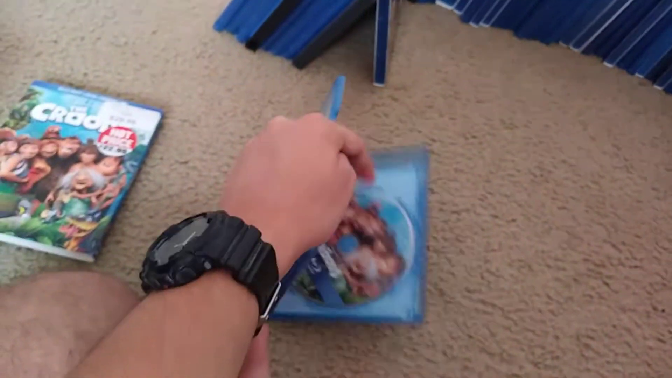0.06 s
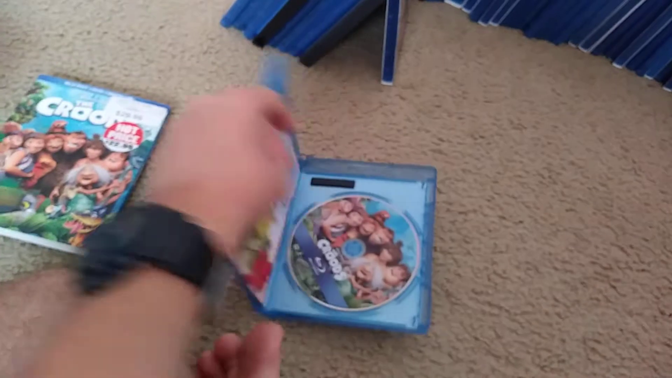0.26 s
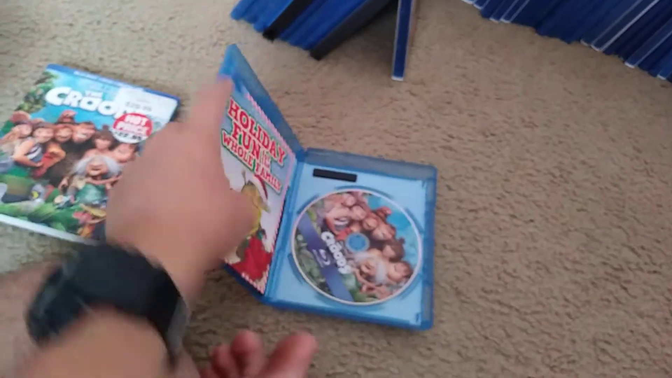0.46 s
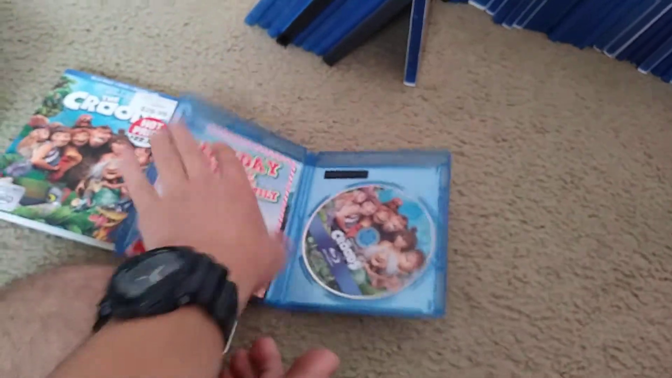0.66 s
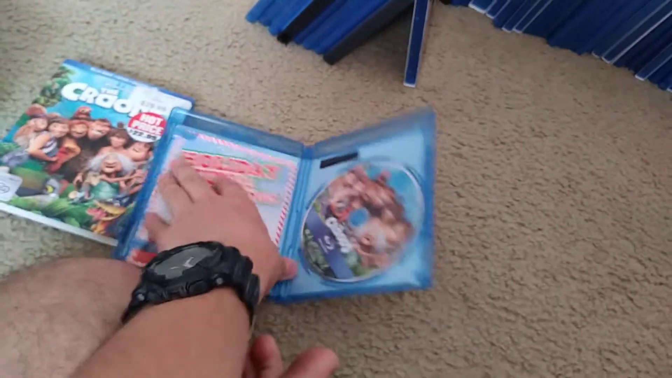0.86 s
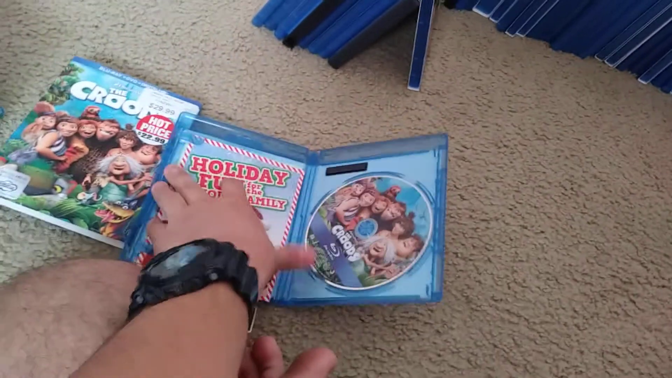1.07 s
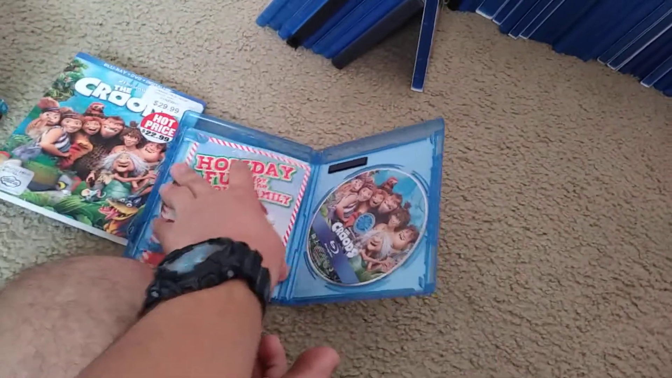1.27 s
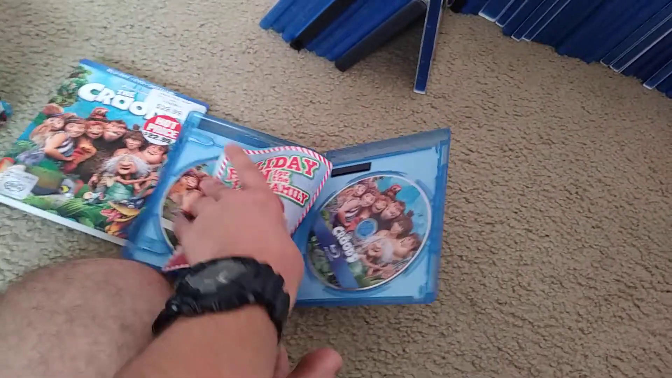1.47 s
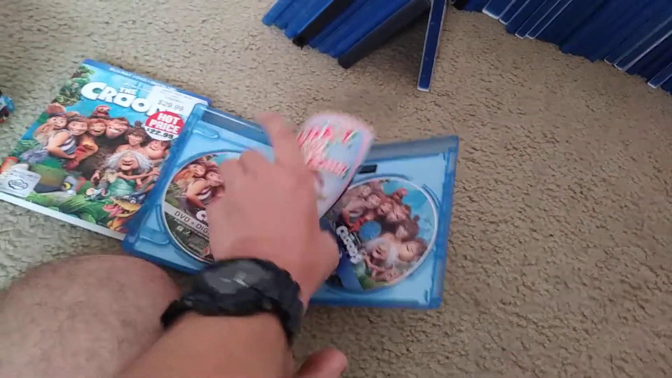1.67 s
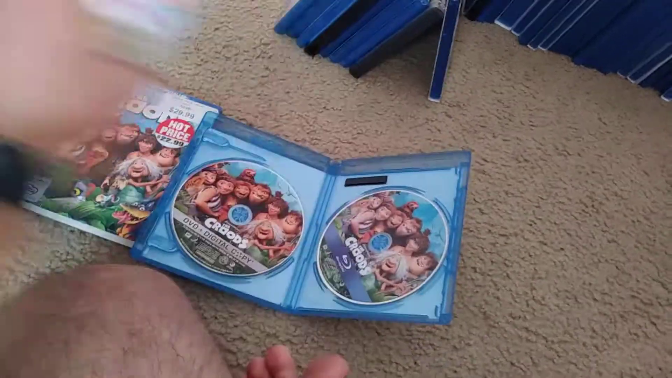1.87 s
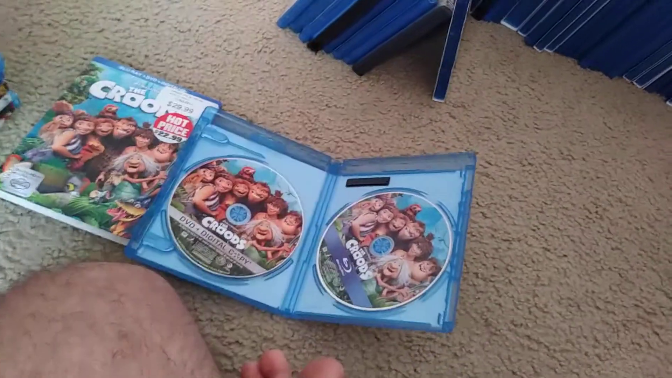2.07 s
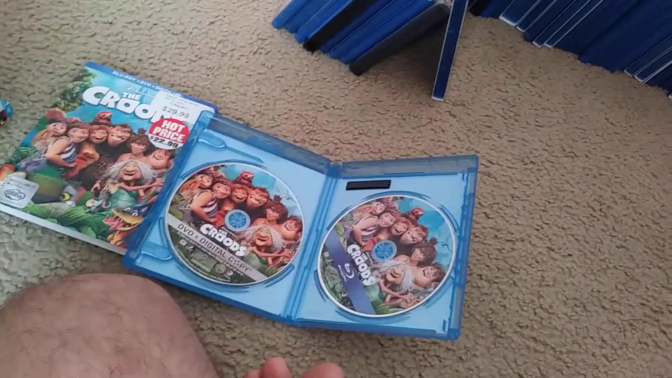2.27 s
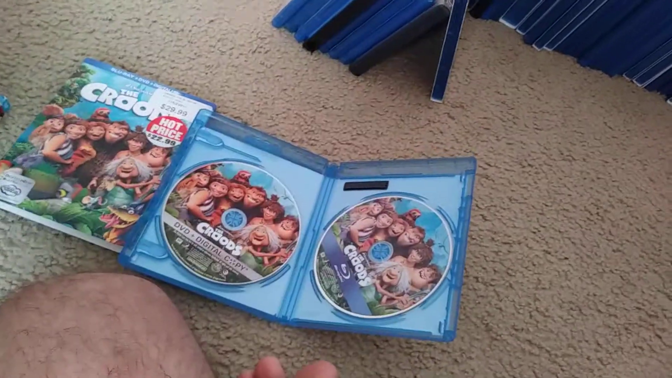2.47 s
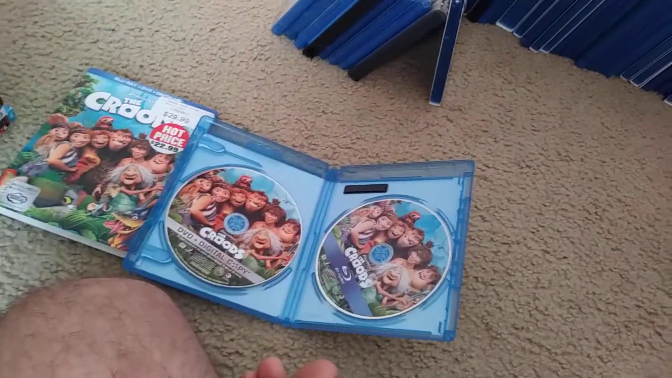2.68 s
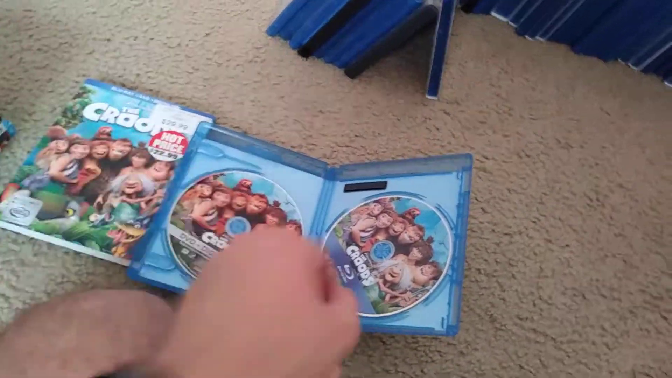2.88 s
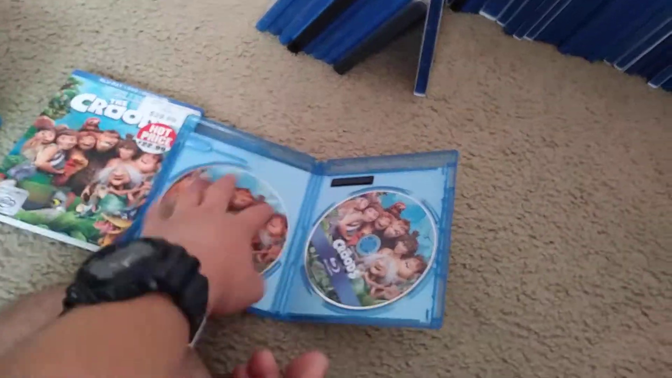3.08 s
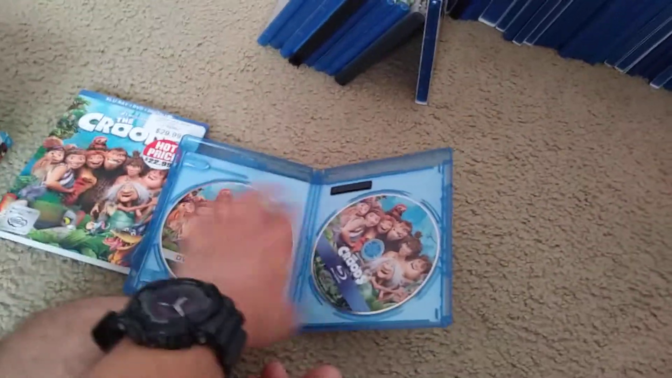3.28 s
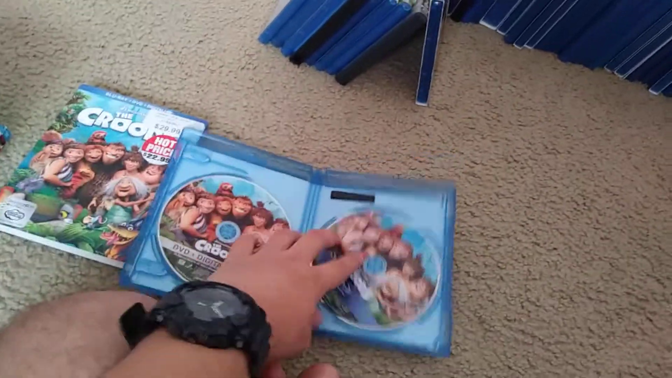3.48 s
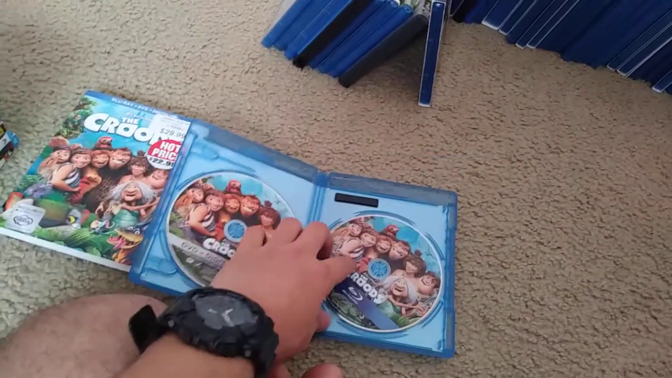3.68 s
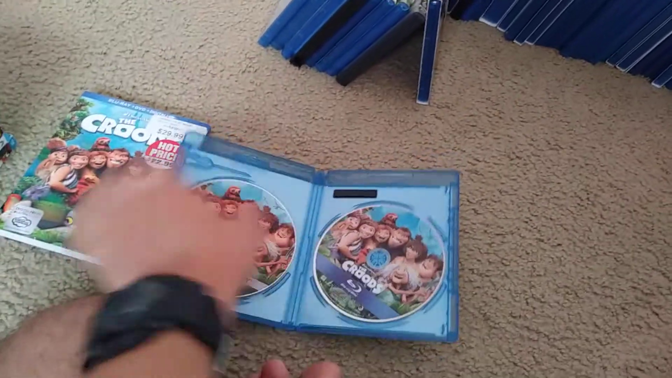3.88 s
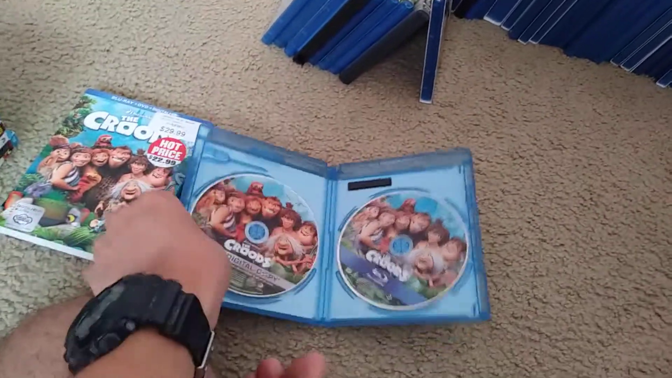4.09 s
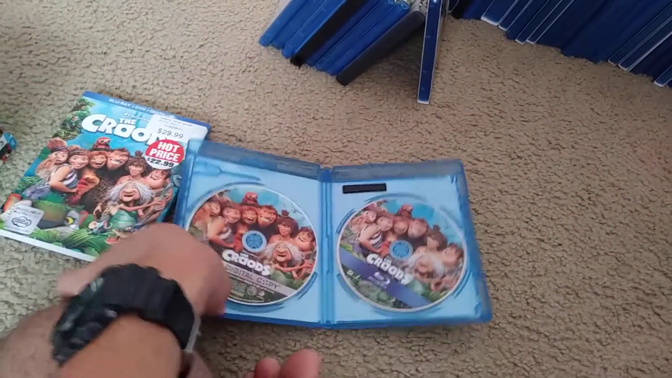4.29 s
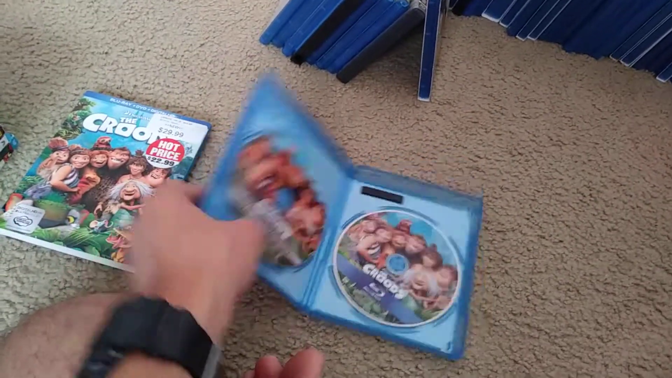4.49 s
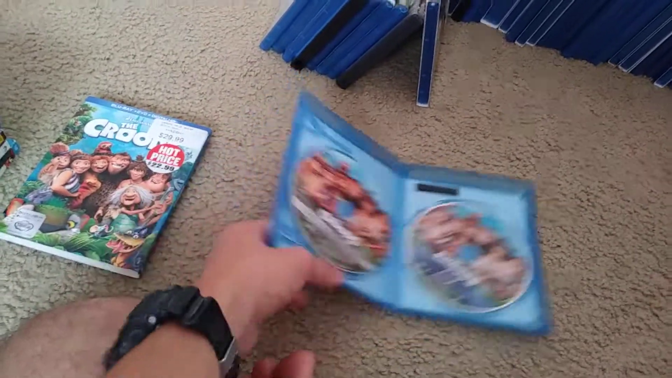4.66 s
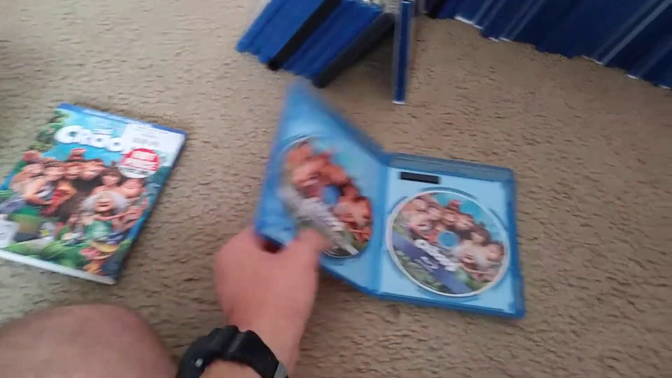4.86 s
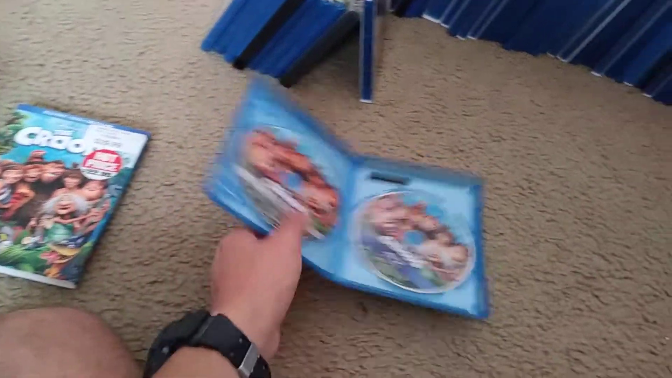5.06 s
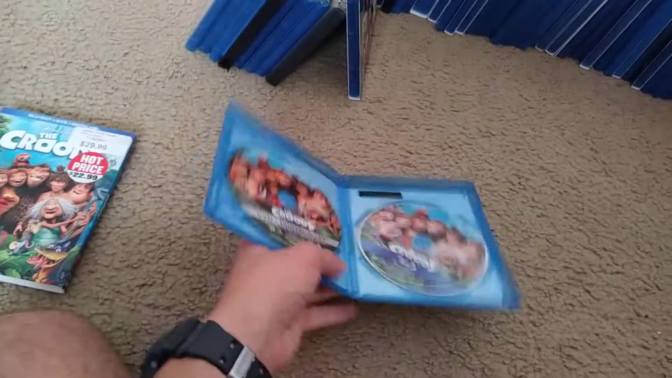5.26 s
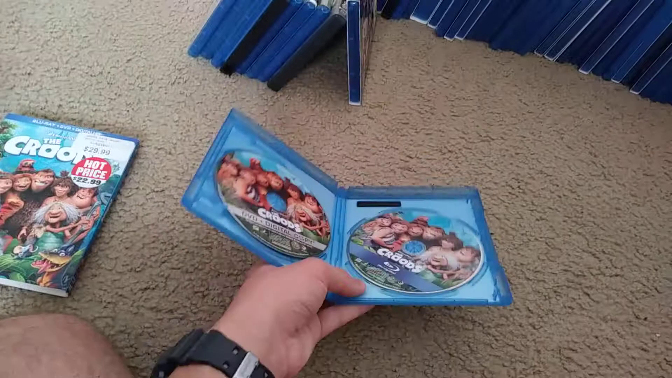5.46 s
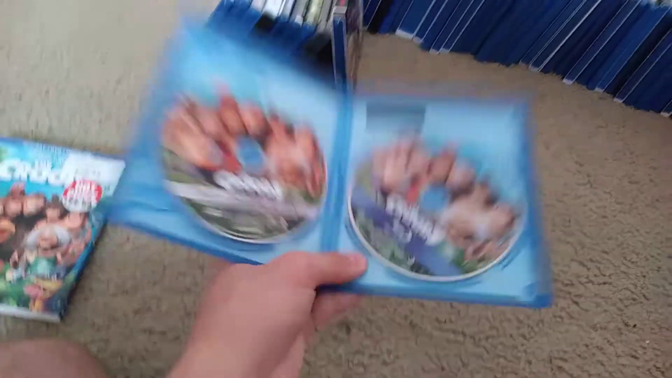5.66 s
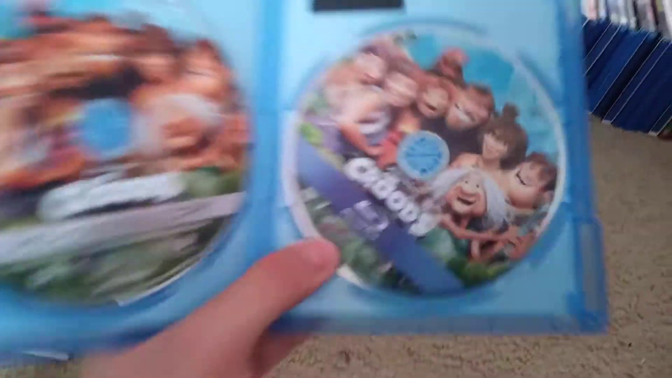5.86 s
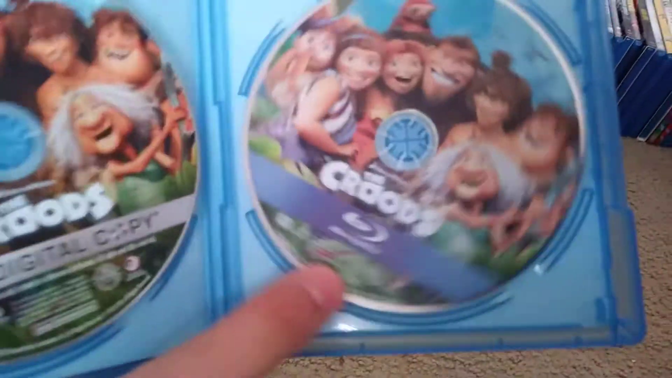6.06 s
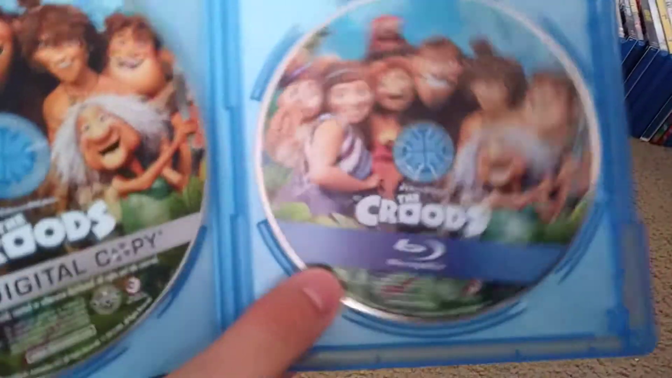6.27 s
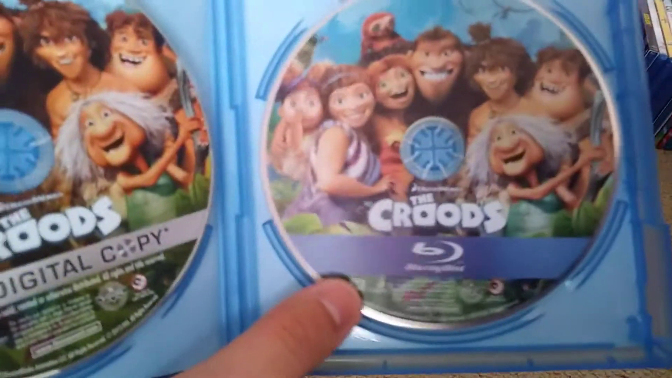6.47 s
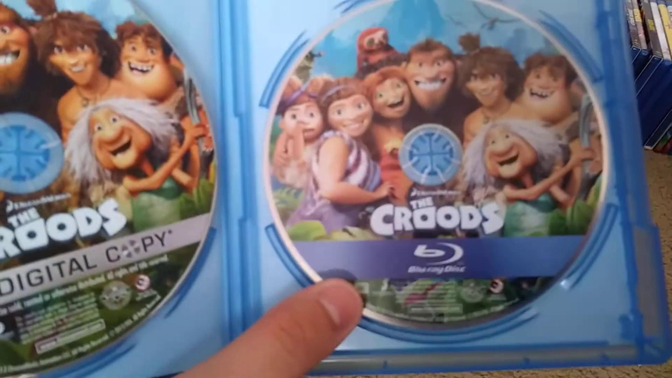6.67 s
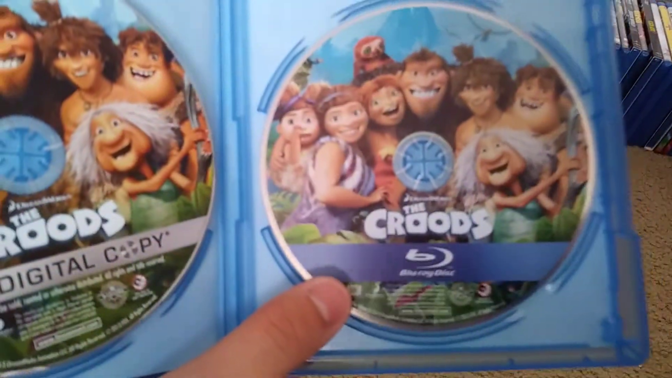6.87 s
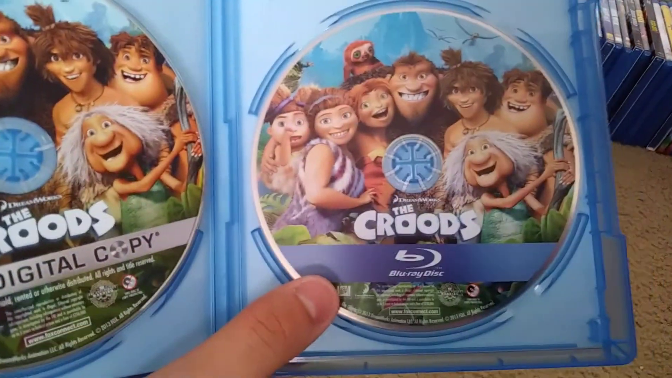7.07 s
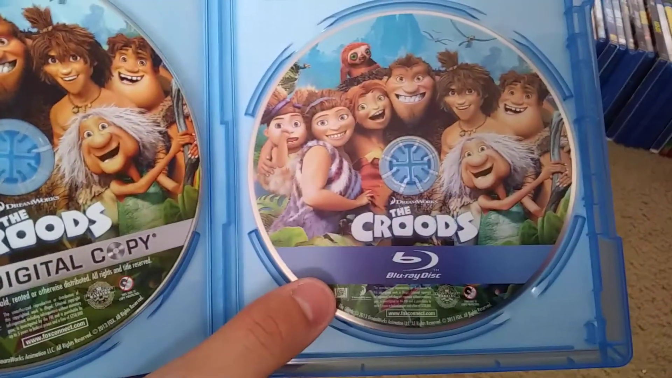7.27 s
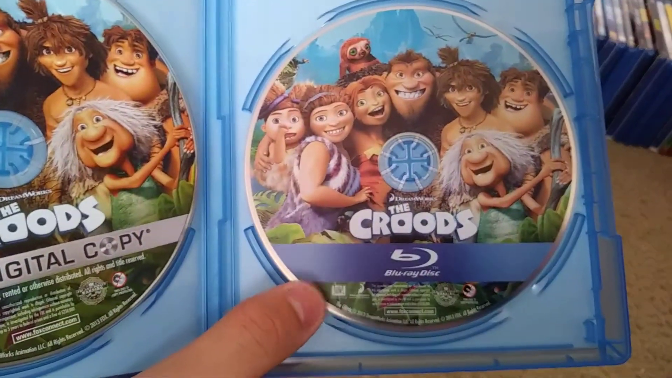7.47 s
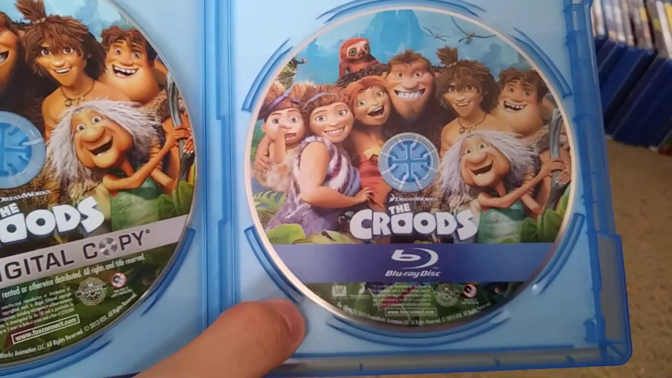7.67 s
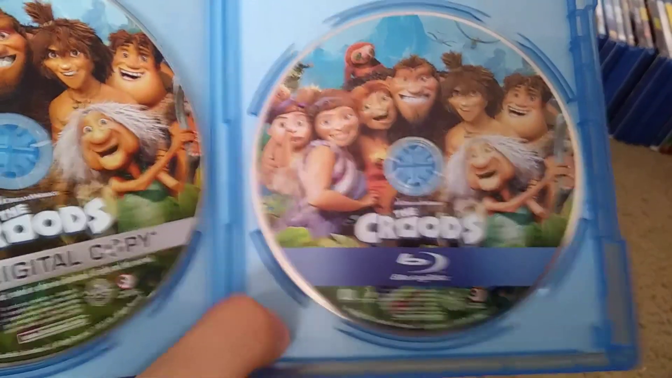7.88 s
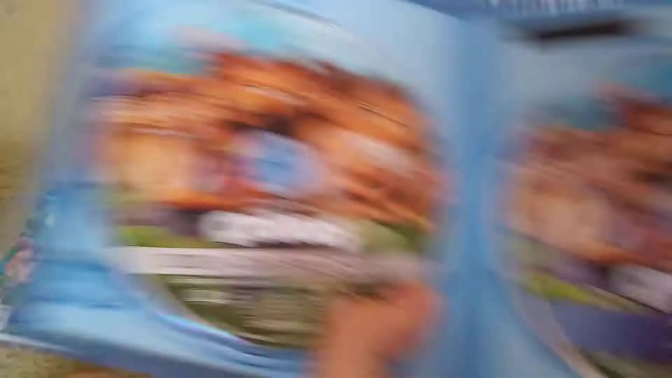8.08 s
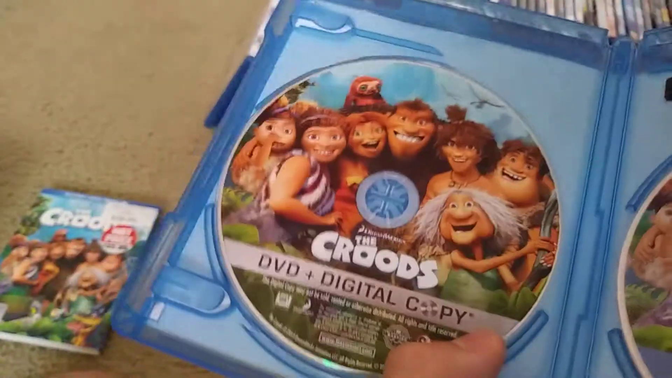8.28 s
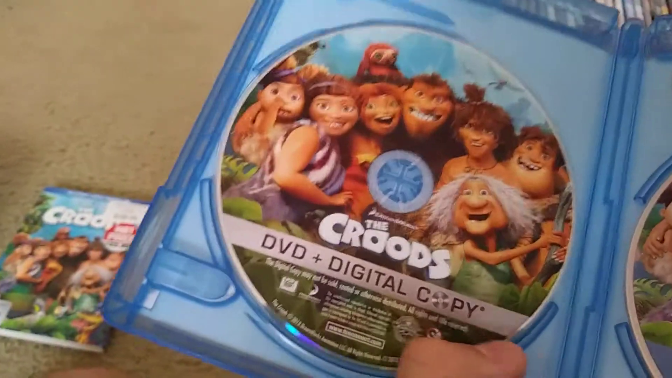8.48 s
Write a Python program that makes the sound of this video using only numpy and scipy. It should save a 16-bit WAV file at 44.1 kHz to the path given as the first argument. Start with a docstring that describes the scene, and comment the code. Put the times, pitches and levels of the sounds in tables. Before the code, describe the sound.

Loud, bright snaps of thin plastic come first, followed by finger slips, a high stick-slip squeak and a solid clack. Paper slides briefly out from under plastic tabs. After sparse light taps, the case is picked up with creaks, dull knocks and ticks, then faint finger rubbing. It is close and dry, with short small-room reflections, soft hiss and a barely audible camera motor.

```python
"""A plastic disc case is snapped open on the carpet of a small room, close to a hand-held camera: filtered bursts.
The lid squeaks back in stick-slip, a paper leaflet slides out, and the case is lifted and tilted, creaking and
ticking: random friction jerks and soft resonant bumps. A pattern of reflections makes the room.
The camera adds hiss, a low hum and a lens drive's faint note; its noise suppressor holds down the hiss
between the sounds, and a limiter rounds off the loudest snaps."""
import sys
import numpy as np
from scipy import signal
from scipy.fft import rfft, irfft
from scipy.io import wavfile
from scipy.ndimage import uniform_filter1d, minimum_filter1d

SR = 44100
rng = np.random.default_rng(int(sys.argv[2]) if len(sys.argv) > 2 else 0)


def pcm_store(signal):
    """Save signal as 16-bit PCM."""
    levels = np.round(np.clip(np.atleast_2d(signal), -1, 1) * 32767)
    wavfile.write(sys.argv[1], SR, levels.astype(np.int16).T)


N = 376613
TIME = np.arange(N) / SR  # s
FREQS = np.fft.rfftfreq(N, 1 / SR)  # Hz


def amp(db):
    """Decibels to gain."""
    return 10 ** (np.asarray(db) / 20)


def unit(x):
    """Scales to rms 1."""
    return x / np.sqrt(np.mean(x ** 2) + 1e-20)


def read(points, hz):
    """Reads a table along a log-frequency axis."""
    f, value = np.transpose(points)
    return np.interp(np.log(hz + 1), np.log(f + 1), value)


def add(mix, s, sound):
    """Adds a sound at time s."""
    part = mix[max(round(s * SR), 0):][:len(sound)]
    part += sound[:len(part)]


def colour(x, spectrum):
    """Filters x by a table of dB over Hz, then scales to rms 1."""
    return unit(irfft(rfft(x) * amp(read(spectrum, FREQS)), N))


def resonate(x, modes):
    """Passes x through steep resonances, at rms 1."""
    response = sum(amp(db) / (1 + 1j * (FREQS - hz) / width) ** 2 for hz, width, db in modes)
    return unit(irfft(rfft(x) * response, N))


def causal(gain):
    """The minimum-phase response with this magnitude: it starts at once and rings afterwards."""
    cepstrum = irfft(np.log(gain + 1e-9))
    half = len(cepstrum) // 2
    cepstrum[1:half] *= 2
    cepstrum[half + 1:] = 0
    return np.exp(rfft(cepstrum))


def drift(per_s):
    """Slow random wander of rms 1; a higher per_s (Hz) wanders faster."""
    return unit(irfft(rfft(rng.standard_normal(N)) * np.exp(-(FREQS / per_s) ** 2), N))


def ripple(count, size):
    """Random peaks and dips across frequency, about size bins wide, rms 1."""
    noise = rng.standard_normal(count)
    return unit(uniform_filter1d(uniform_filter1d(noise, size=size), size=size))


def stroke(start, length, attack_s, release_s):
    """Gain of one movement: it builds up, holds and dies away."""
    rise = np.clip((TIME - start) / attack_s, 0, 1)
    return rise * np.exp(-np.clip((TIME - start - length) / release_s, 0, 50))


def strokes(rows, attack_s, release_s):
    """Gain over time of a table of movements."""
    return sum(amp(db) * stroke(start, length, attack_s, release_s) for start, length, db in rows)


def friction(per_s, spread_db):
    """Tiny stick-slip jerks at random moments, a few of them large."""
    size = amp(spread_db * np.minimum(rng.exponential(1, N), 4))
    return size * rng.choice([-1, 1], N) * (rng.random(N) < per_s / SR)


def shifting(x, depth_db):
    """As the contact point moves, different resonances of the case come and go."""
    z = signal.stft(x, nperseg=1024, noverlap=768)[2]
    field = rng.standard_normal(z.shape)
    for _ in range(2):
        field = uniform_filter1d(field, size=4, axis=0)  # across frequency
        field = uniform_filter1d(field, size=6, axis=1)  # across time
    gain = amp(depth_db * np.minimum(unit(field), 2.4))
    return unit(signal.istft(z * gain, nperseg=1024, noverlap=768)[1][:N])


def microphone_hiss(level_db=-58):
    """Microphone hiss: steady noise with a fixed spectrum."""
    # Colour of the hiss. Each row: frequency in Hz, relative level in dB.
    hiss_spectrum = [(25, -26), (70, 8.5), (110, 0), (200, -4.5), (400, -9.5), (700, -7), (1200, -4),
                     (2300, -5), (3300, -7.5), (5100, -2.5), (6200, -7.5), (8000, -16), (11000, -24.5),
                     (14000, -25), (15500, -18.5)]
    return amp(level_db) * colour(rng.standard_normal(N), hiss_spectrum)


def low_hum(gain_db=5):
    """Steady low sine partials that swell and fade together."""
    # Partials of the hum. Each row: frequency in Hz, level in dB ahead of gain and swell.
    partials = [(70, -79.5), (140, -82), (210, -93.5)]
    # Slow swell of the hum. Each row: time in seconds, added gain in dB.
    swell = [(0, 5.5), (2.9, 4.5), (4.5, 5), (8.6, 4.5)]
    hum = sum(amp(db + gain_db) * unit(np.sin(2 * np.pi * (hz * TIME + rng.random()))) for hz, db in partials)
    return hum * amp(np.interp(TIME, *np.transpose(swell)))


def lens_drive(gain_db=-1, pitch_hz=279, waver=0.0088, flutter_db=4.9):
    """The lens drive's note, wavering in pitch and level, sounds in short spurts."""
    # Spurts of the drive. Each row: start in seconds, length in seconds, level in dB ahead of the gain.
    spurts = [(1.38, .3, -63.5), (2.01, .16, -59.5), (2.46, 0.0636, -63), (3.67, 0.0647, -61.5),
              (4, 0.148, -62), (6.25, 0.15, -64.5), (6.65, 0.066, -63.5), (7.04, .06, -60.5),
              (7.22, .33, -62.5), (7.99, 0.15, -58), (8.22, .11, -62.5), (8.47, 0.12, -66)]
    hz = pitch_hz * (1 + waver * drift(per_s=37))
    note = unit(np.sin(2 * np.pi * np.cumsum(hz) / SR))
    level = amp(gain_db + flutter_db * drift(per_s=32))
    return strokes(spurts, attack_s=.025, release_s=.025) * level * note


def room(x, wet_db=-2, rise_s=0.0069):
    """Dense reflections from near walls and shelves, each band dying at its own speed."""
    # Decay of the room. Each row: frequency in Hz, time to fall 60 dB in seconds.
    decay = [(150, 0.56), (600, 0.32), (1800, 0.23), (4600, 0.29), (9000, 0.28), (15000, 0.39)]
    count = 1200
    at = np.arange(count) * 20 + rng.integers(0, 20, count)  # one reflection in every 20 samples
    taps = np.zeros(SR)
    taps[at] = rng.choice([-1., 1.], count)
    hz, t, z = signal.stft(taps, SR, nperseg=256)
    fading = z * 1000 ** (-t / read(decay, hz)[:, None])
    tail = signal.istft(fading, SR, nperseg=256)[1][:SR]
    tail = tail * (1 - np.exp(-(TIME[:SR] / rise_s) ** 2))
    return x + amp(wet_db) * signal.fftconvolve(x, tail / np.linalg.norm(tail))[:N]


def case_handling(gain_db=-1, hold_db=-68.5):
    """The case shifts in the hand and on the carpet: sparse jerks under changing resonances."""
    # Shifts of the case. Each row: start in seconds, length in seconds, level in dB ahead of the gain.
    shifts = [(.42, 0.066, -58), (1.3, 0.285, -69.5), (2.05, 0.18, -77.5), (4.02, 0.091, -64),
              (5.05, .22, -65), (5.38, .06, -54), (8, .35, -70.5)]
    # Colour of the rustle. Each row: frequency in Hz, relative level in dB.
    rustle_spectrum = [(25, -35), (60, -19.5), (150, -0.5), (400, 2), (700, -6), (1300, -9.5),
                       (1800, -10.5), (2200, -3), (3200, -18), (8000, -38.5)]
    # the hand's faint rustle (hold_db, also ahead of the gain) never stops
    level = amp(hold_db) + strokes(shifts, attack_s=0.031, release_s=0.014)
    jerks = shifting(friction(per_s=700, spread_db=3), depth_db=12.5)
    return amp(gain_db) * level * colour(jerks, rustle_spectrum)


def finger_slips(gain_db=-5):
    """Fingers slip over the plastic: bright friction with very uneven jerks."""
    # Slips of the fingers. Each row: start in seconds, length in seconds, level in dB ahead of the gain.
    slips = [(.195, 0.073, -51), (.3, .04, -47), (.91, 0.025, -45), (2.095, .035, -55.5),
             (4.51, 0.094, -64.5), (4.77, .04, -74), (5.05, .15, -83), (5.34, 0.045, -56),
             (5.64, 0.532, -59.5)]
    # Colour of skin on plastic. Each row: frequency in Hz, relative level in dB.
    skin_spectrum = [(1500, -28.5), (4000, -9), (6000, -2.5), (8000, -1), (10500, -8.5), (13000, -22),
                     (16000, -34.5)]
    level = strokes(slips, attack_s=0.0055, release_s=0.0078)
    jerks = shifting(friction(per_s=2100, spread_db=10.5), depth_db=10.0)
    return amp(gain_db) * level * colour(jerks, skin_spectrum)


def paper_leaflet(level_db=-37.5):
    """The leaflet is pulled harder until it slips from under its tabs, then slides free."""
    # Colour of paper on plastic. Each row: frequency in Hz, relative level in dB.
    paper_spectrum = [(200, -35), (800, -24), (1600, -27), (2400, -16), (3500, -7), (5600, 2), (7300, 1.5),
                      (9500, -7.5), (12000, -28), (16000, -37)]
    pull_s, slip_s, free_s = 1.35, 1.492, 1.65
    pull_db_per_s, slide_db_per_s = 202, 84  # build-up before the slip, easing after it
    pull = amp(np.minimum(pull_db_per_s * (TIME - slip_s), slide_db_per_s * (slip_s - TIME)))
    pull = pull * stroke(pull_s, free_s - pull_s, attack_s=.01, release_s=.012)
    jerks = shifting(friction(per_s=1400, spread_db=2.5), depth_db=4.0)
    return amp(level_db) * pull * colour(jerks, paper_spectrum)


def bumps(width=.09, gain_db=-3):
    """Dull contacts of hand and case swell and fade in one narrow resonance of five detuned sines."""
    # Each row: start in seconds, relative peak level in dB, centre frequency in Hz, swell time in seconds.
    contacts = [(.454, -56.5, 332, 0.0084), (.793, -31.5, 924, 0.0037), (1.21, -51, 402.2, .004),
                (1.361, -54, 161, 0.02), (1.87, -57.5, 685, 0.011), (2.02, -62, 481, 0.029),
                (3.395, -54.5, 690, 0.007), (3.957, -50, 936, 0.0084), (4, -48.5, 349, 0.0045),
                (4.198, -55, 134, .025), (4.279, -53.5, 481.6, 0.017), (4.955, -58, 291, 0.02),
                (5.034, -52, 440, 0.0037), (5.074, -53.5, 269, 0.011), (5.259, -47, 485.5, 0.02),
                (5.287, -47.5, 2704, 0.015), (5.3, -42, 334.7, 0.0083), (5.305, -41, 908, 0.0035),
                (5.362, -47, 1324, 0.011), (5.42, -59, 2160, 0.0074), (5.58, -42.5, 655, 0.0033),
                (6.029, -54, 1492, 0.018), (6.74, -52, 2200, 0.0074), (7, -56.5, 142, .027),
                (7.575, -56.5, 1395, .008), (8.256, -54, 1080, .007)]
    out, t = np.zeros(N), np.arange(SR // 4) / SR
    for s, db, hz, swell in contacts:
        partials = hz * (1 + width * np.linspace(-1, 1, 5)[:, None])
        partials = partials * (1 + rng.normal(0, 0.028, partials.shape))
        phase = rng.random(partials.shape)  # cycles
        ring = unit(np.sin(2 * np.pi * (partials * t + phase)).sum(0))
        envelope = t / swell * np.exp(1 - t / swell)
        add(out, s, amp(db + gain_db) * ring * envelope)
    return out


def lid(squeal_db=-43, squeak_db=-44, groan_db=-52, scrape_db=-47, scrape_power=1.47, stutter_db=3.5, waver=0.0174):
    """Stick-slip squeals and excites the lid's resonances as it is folded back in two pushes."""
    # Pushes on the lid. Each row: start in seconds, length in seconds, effort in dB.
    pushes = [(.447, 0.081, 0), (.6, 0.11, -12.5)]
    # Squeaking resonances of the lid. Each row: frequency in Hz, width in Hz, relative level in dB.
    squeak_modes = [(3820, 143, 10), (3980, 180, -4), (4040, 150, -17)]
    # Groaning resonances of the lid. Each row: frequency in Hz, width in Hz, relative level in dB.
    groan_modes = [(1440, 95, -1), (1900, 120, 6), (2136, 85, -8.5)]
    # Colour of the scrape. Each row: frequency in Hz, relative level in dB.
    scrape_spectrum = [(3000, -36), (4400, -33), (4900, 14), (5700, 8), (6400, 5), (7600, 7), (10000, 1.5),
                       (15000, -42)]
    squeal_hz, sag_hz_per_s = 3870, 450  # the hinge's squeal, sinking as the lid slows
    stutter = amp(stutter_db * drift(per_s=64))
    jerks = unit(friction(per_s=3500, spread_db=1.0)) * stutter
    sinking_hz = squeal_hz - sag_hz_per_s * np.clip(TIME - pushes[0][0], 0, 1)
    hz = sinking_hz * (1 + waver * drift(per_s=90))
    squeal = unit(np.sin(2 * np.pi * np.cumsum(hz) / SR) * stutter)
    sticking = strokes(pushes, attack_s=0.029, release_s=0.039)
    # the scrape comes sooner than the squeal and needs a hard push
    scraping = strokes(pushes, attack_s=.006, release_s=.03) ** scrape_power
    ring = amp(squeak_db) * resonate(jerks, squeak_modes) + amp(groan_db) * resonate(jerks, groan_modes)
    scrape = amp(scrape_db) * scraping * colour(jerks, scrape_spectrum)
    return sticking * (amp(squeal_db) * squeal + ring) + scrape


def shell(x, direct_db=-1.5, ring_db=-3.0):
    """The thin panels ring briefly after each jolt: one decaying resonator per mode."""
    # Modes of the shell. Each row: frequency in Hz, time to fall 60 dB in seconds, relative level in dB.
    modes = [(460, 0.11, -3.5), (974, 0.13, -2.5), (1415, .04, -7), (2110, 0.055, -2), (2480, 0.051, -6.5),
             (2828, 0.053, 1.5), (3960, 0.046, -4.5), (4400, 0.028, -6), (5700, .02, -6.5),
             (6370, 0.036, -6)]
    out = amp(direct_db) * x
    for hz, t60, db in modes:
        r = np.exp(-np.log(1000) / (t60 * SR))
        pole = r * np.exp(2j * np.pi * hz / SR)
        ringing = signal.lfilter([1 - r], [1, -pole], x + 1e-18).real
        out = out + amp(db + ring_db) * 2 * ringing
    return out


def clicks(low_db=-12, dip_db=-3, top_db=-18, air_db=-32, ring_width=0.086, size=4096):
    """Each snap or tick is a brief chatter of plastic edges, coloured by where it strikes."""
    # Each row: start in seconds, strength around 5 kHz in dB, thud, clack and tick (low, middle and high bands)
    # in dB relative to that, chatter time in seconds (half the burst's decay), pitch of the struck part in Hz.
    snaps = [(0.0255, 20, -12.5, -3, -6.5, .0007, 6140), (.034, 19, -8.5, 1.5, -11.5, .0007, 5417),
             (0.0411, 5.5, -8.5, 4.5, -12, .003, 2363), (0.0546, 10, -11.5, -5, -8.5, 0.00066, 6480),
             (.0664, 3, -8.5, 2.5, -8, .002, 2500), (0.1288, 0.5, -19, 0.5, -12.5, .0005, 5290),
             (0.3324, 10.5, -21, -8, -7.5, 0.00077, 4380), (0.3346, 12, -21.5, -13, -12, .0004, 5470),
             (.427, -8, 1, -36, 5.5, .0005, 6680), (0.4496, 4, -1.5, -21.5, -10.5, .0008, 5400),
             (0.4648, -1, -11, -17, -11, .0026, 5000), (0.7854, 0.5, -18.5, 3, -12, .0025, 4100),
             (.794, 9.5, -19, 0, -11, .0012, 5770), (0.8324, 0.5, -46, -2, -10, .0012, 4780),
             (.86, -6.5, -2.5, -12.5, -7.5, .0025, 3900), (1.3374, -12.5, -24, -6, -7.5, .004, 6150),
             (1.3509, -9, -20, 10.5, -15, .0035, 1760), (1.487, 4, -47, 0.5, -9, .0016, 6400),
             (1.5946, -4.5, -37, -28, 1.5, .0019, 7540), (1.603, -14.5, -11, 0, -4, .0025, 5700),
             (1.648, -13, -3, -7.5, 4.5, .0009, 6740), (2.0831, -4, -19, -1.5, -18, 0.0036, 6070),
             (2.1388, -13, -7, -21, -6.5, .002, 6500), (2.171, -11, -12, -13, -11, .0023, 5440),
             (2.192, -2, -24, -7.5, -21, 0.0023, 5600), (2.199, 1, -32, -2.5, -19, 0.0041, 6150),
             (2.3635, -18.5, -6.5, 1, -7.5, .0027, 2385), (3.1252, -10.5, -13.5, -19, -12, .0014, 6600),
             (3.9578, -12.5, -17.5, -8, -14, .0028, 3800), (3.998, -13.5, -19, -26.5, -13.5, .004, 4350),
             (4.763, -8, -19, -23, -2.5, .0032, 4930), (4.791, -11.5, -36, -42, 6.5, .0012, 6880),
             (4.8467, -10, -11.5, -30, -7, .004, 7400), (4.9578, 8.5, -21.5, -22.5, -5, .0007, 6470),
             (5.0753, -13, 8.5, -19.5, -12, .0023, 5950), (5.0967, -23.5, 4, 9, 13.5, .0013, 8200),
             (5.1781, -22, -10, -11, 9.5, .0018, 8100), (5.2877, 2, -4, -17, -7.5, 0.0027, 4000),
             (5.2942, -3.5, 3.5, -10, -13, .001, 3900), (5.3075, -1.5, 0, -42, -3, .0005, 6850),
             (5.324, -0.5, -5.5, -18, 0, .0008, 6900), (5.3302, -6, -13, -6.5, -1, .0015, 3970),
             (5.3482, -32, 0, -30.5, -2.5, .0014, 4100), (5.3889, -10, 3, -3.5, 8.5, .0013, 7540),
             (5.583, -2.5, -1.5, -17, -22.5, .0005, 6100), (5.6253, -13, -11, -22, 9, .001, 6730),
             (5.6437, -19.5, 7.5, -20.5, 10.5, .0015, 8350), (7.0195, 3.5, -35.5, -20, -17.5, .0004, 4880)]
    ring_top_db, ring_per_db = 17.5, 0.44  # a harder blow excites the whole case, so its pitch stands out less
    ripple_db, ripple_per_db = 4, 0.3039  # depth of the chance resonances: light touches ping, hard snaps crack
    out, t, hz = np.zeros(N), np.arange(size) / SR, np.fft.rfftfreq(size, 1 / SR)
    for s, db, thud, clack, tick, chatter, ring_hz in snaps:
        burst = rfft(rng.standard_normal(size) * np.exp(-(t / (2 * chatter)) ** 2))
        # flattened spectrum: the chatter only spreads the blow in time
        burst = burst / causal(np.sqrt(abs(uniform_filter1d(abs(burst) ** 2, size=91))))
        # the struck part has one strong resonance among many chance ones
        ring = amp(ring_top_db - ring_per_db * db)
        uneven_db = ripple_db - ripple_per_db * db
        peaks = 1 + (ring - 1) / (1 + ((hz / ring_hz - 1) / ring_width) ** 2)
        peaks = peaks * amp(uneven_db * ripple(len(hz), size=20))
        # resonances gather energy from their neighbourhood and add none
        peaks = peaks / np.sqrt(uniform_filter1d(uniform_filter1d(peaks ** 2, size=221), size=221))
        shape = [(25, thud + 2 * low_db), (170, thud + low_db / 2), (300, thud),
                 (1000, (thud + clack) / 2 + dip_db), (2300, clack), (3300, clack - 3), (4000, 0), (6000, 0),
                 (8700, tick), (12000, tick + top_db), (16000, tick + air_db)]  # (Hz, dB)
        add(out, s, amp(db) * irfft(burst * causal(amp(read(shape, hz)) * peaks)))
    return out


def scene():
    """The case and the hands in the room, over the background."""
    case = shell(clicks()) + lid() + bumps()
    rubbing = paper_leaflet() + finger_slips() + case_handling()
    background = microphone_hiss() + low_hum() + lens_drive()
    return (room(case + rubbing) + background)[None]


def suppress(x, depth_db=-8, open_db=7.0, knee_db=5.0):
    """Noise suppressor: bands that do not stand out of the steady noise are turned down."""
    z = signal.stft(x, nperseg=1024, noverlap=768)[2]
    power = uniform_filter1d(uniform_filter1d(abs(z) ** 2, size=3, axis=0), size=5, axis=1)
    power_db = 10 * np.log10(abs(power) + 1e-20)
    noise_db = np.percentile(power_db, 35, axis=1, keepdims=True)  # steady level of each band
    shut = (1 - np.tanh((power_db - noise_db - open_db) / knee_db)) / 2  # 0 open, 1 shut
    return signal.istft(z * amp(depth_db * shut), nperseg=1024, noverlap=768)[1][:N]


def limit(x, ceiling=.88):
    """A fast limiter rounds off the loudest snaps."""
    allowed = np.minimum(1, ceiling / (abs(x) + 1e-9))
    return x * uniform_filter1d(minimum_filter1d(allowed, size=15), size=15)


def record(dry, edge_hz=15950):
    """Noise suppression, the limiter, then the band limit."""
    limited = limit(suppress(dry[0]))
    lowpass = signal.firwin(511, edge_hz, window=("kaiser", 9), fs=SR)
    return signal.oaconvolve(limited, lowpass, "same")[None]


dry = scene()
out = record(dry)
pcm_store(out)
```